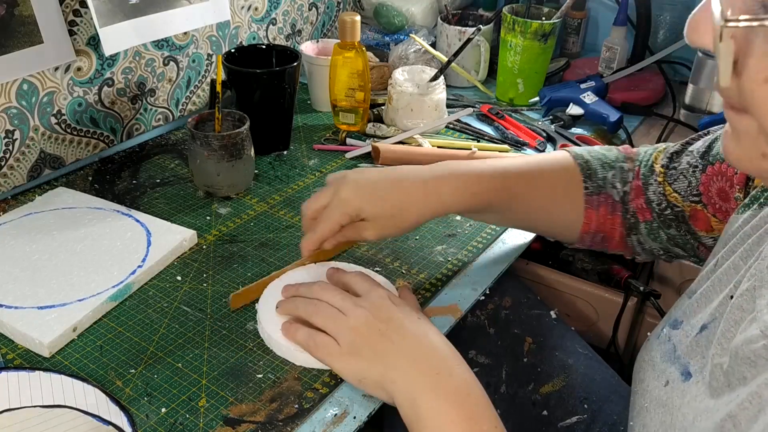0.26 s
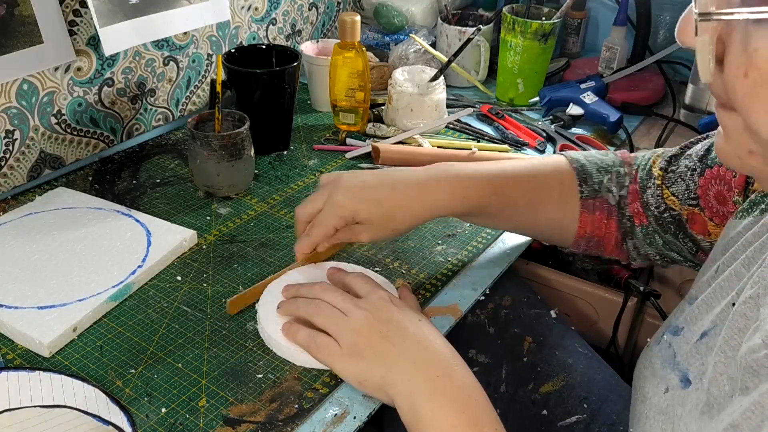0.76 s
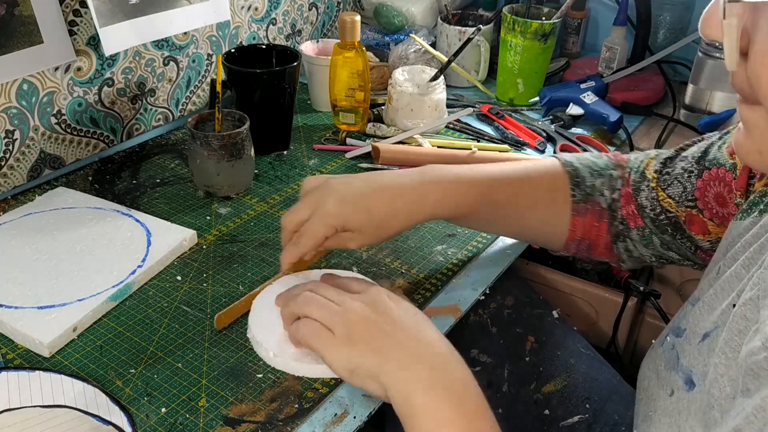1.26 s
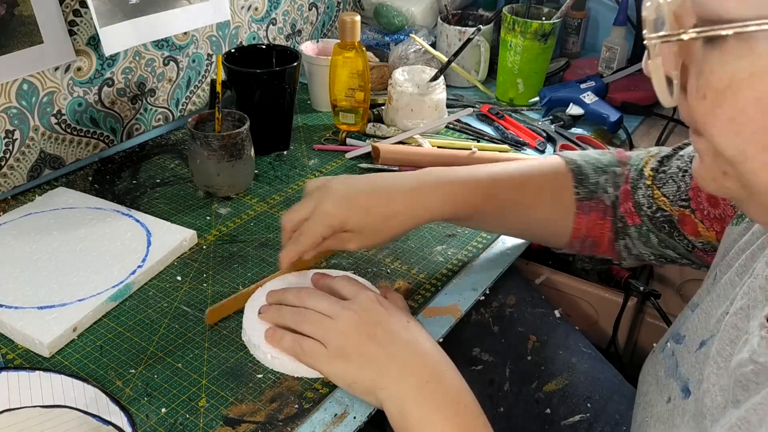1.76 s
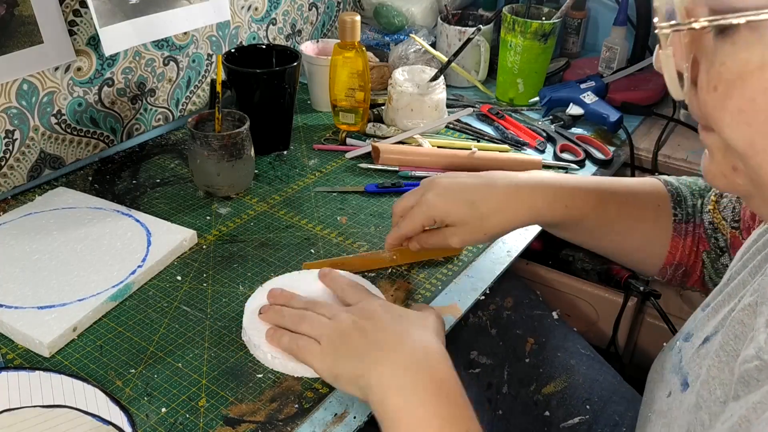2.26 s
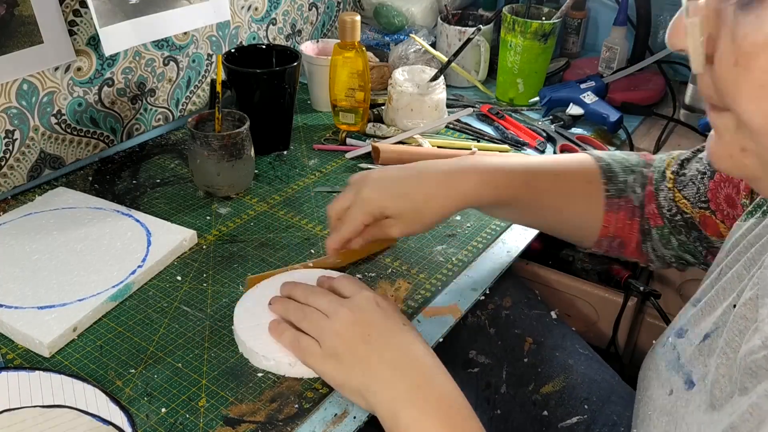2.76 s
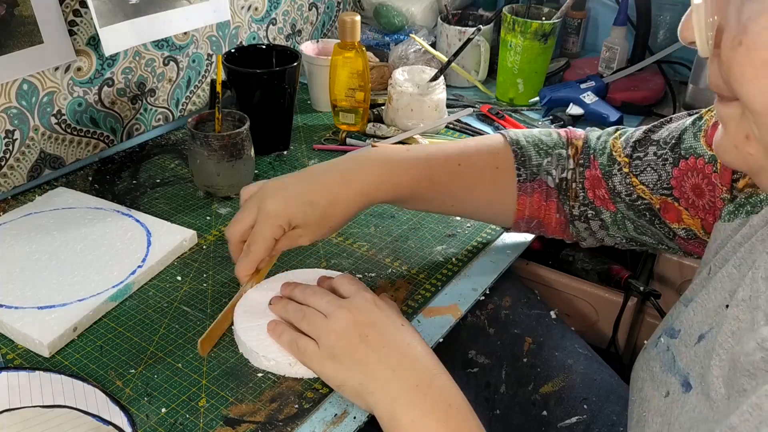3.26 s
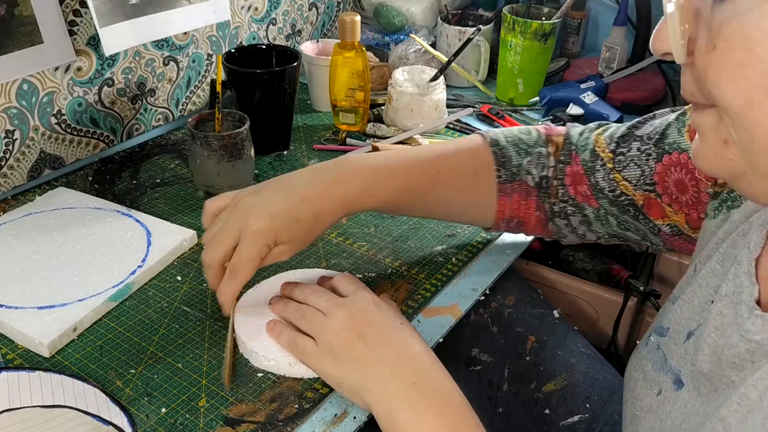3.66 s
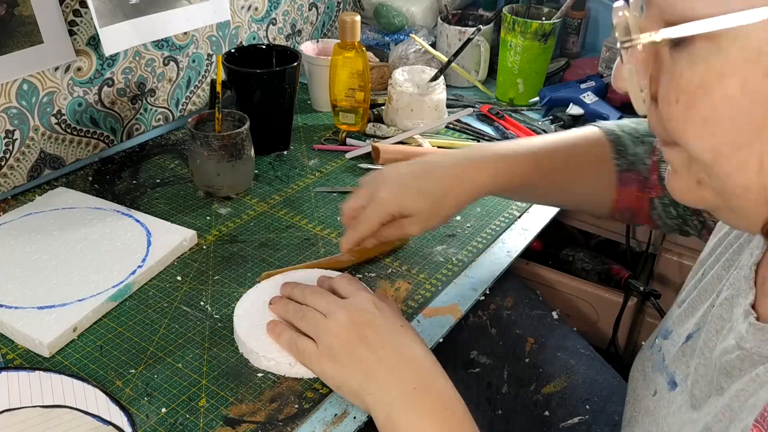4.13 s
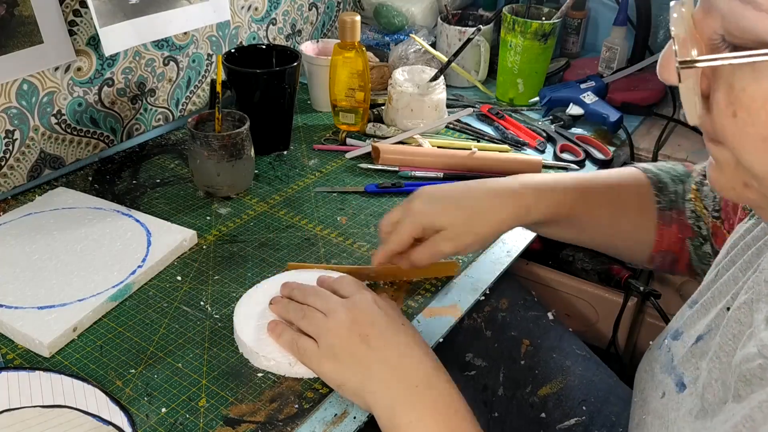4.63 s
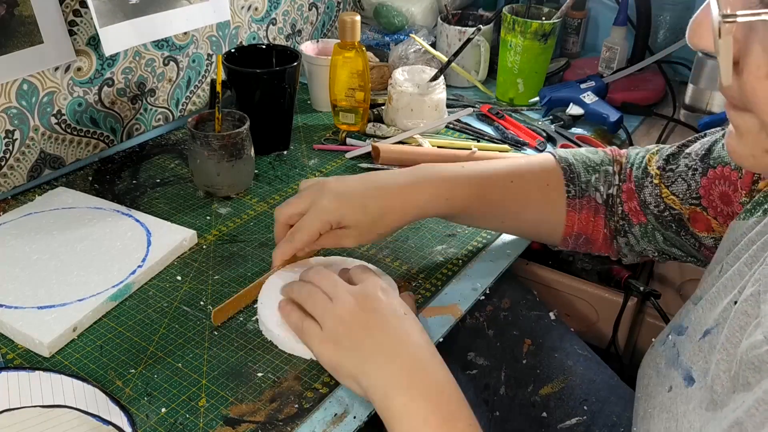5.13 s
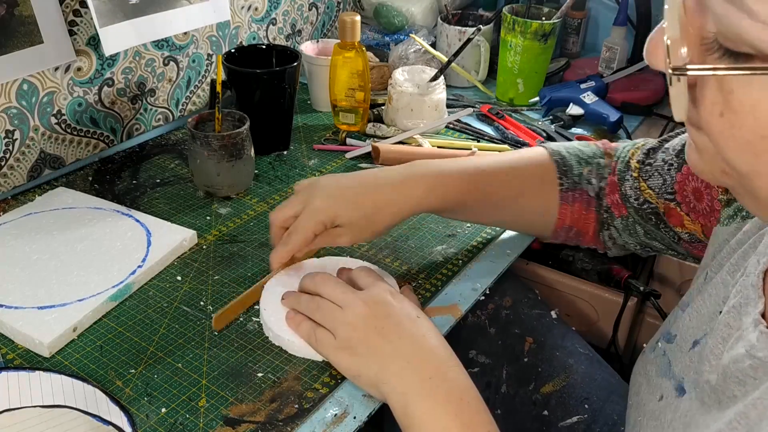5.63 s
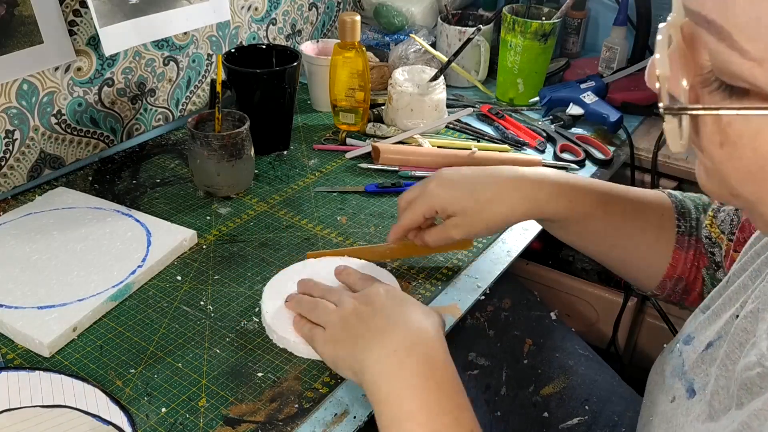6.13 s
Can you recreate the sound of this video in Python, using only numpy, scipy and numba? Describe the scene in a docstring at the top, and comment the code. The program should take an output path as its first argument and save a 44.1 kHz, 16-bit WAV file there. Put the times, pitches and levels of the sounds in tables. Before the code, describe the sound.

Close to a phone microphone in a small craft room, a flat file scrapes to and fro along a foam disc's edge. Quick, uneven strokes swell and fade, each a bright crackling rasp with a thin ringing blade and a lighter body from the disc. Around the middle the rasp turns hollower, then brightens again; small knocks and bead ticks grow more frequent late. Low room noise lies underneath.

```python
"""Flat file on a foam disc, close by

On a craft bench in a small room, a flat file rubs to and fro along a foam disc's rim, close to a phone.
Random snaps make the crackle of breaking cells; the same kind of grains ring the blade and shake the disc.
The file knocks as it lands, single beads tick, and loose crumbs scrape softly underneath.
Hands, bench and walls add short reflections over low room noise, a growing rumble and faint hums.
The phone's two microphone ports colour the sound differently and lose the extreme treble.
"""
import sys
import numpy as np
from scipy import signal
from scipy.fft import rfft, irfft, next_fast_len
from scipy.io import wavfile
from scipy.ndimage import map_coordinates
from numba import njit

SR = 44100
rng = np.random.default_rng(int(sys.argv[2]) if len(sys.argv) > 2 else 0)


def log_audio(samples):
    """Write samples as a 16-bit WAV file to the path given in sys.argv[1]."""
    # one column per channel
    frames = np.atleast_2d(samples).T
    # limit to full scale, then quantise
    limited = np.clip(frames, -1, 1)
    pcm = np.round(limited * 32767).astype(np.int16)
    wavfile.write(sys.argv[1], SR, pcm)


N = 281799
TIME = np.arange(N) / SR

# Strokes of the file; blade and disc are relative to the bite at full effort:
# start_s [s], fastest_s [s], end_s [s], swell_db [dB], fade_db [dB], bite_db [dB],
# blade_db [dB], disc_db [dB], blade resonance near the fastest moment pitch_hz [Hz]
FILE_STROKES = [(-0.015, 0.109, 0.31, 19.5, 20.5, -30, -7.5, -19.5, 3700),
                (0.282, 0.419, 0.59, 12.5, 15, -32.5, -9.5, -29.5, 4500),
                (0.555, 0.69, 0.85, 10.5, 28, -33.5, -8.5, -27, 4850),
                (0.808, 1.015, 1.127, 15, 10, -31.5, -10.5, -21.5, 4160),
                (1.07, 1.23, 1.353, 7.5, 18, -36.0, -6.5, -18, 3270),
                (1.259, 1.31, 1.535, 14, 27.5, -31, -6.5, -19, 3700),
                (1.466, 1.593, 1.745, 8.5, 16.5, -34, -15, -24, 3700),
                (1.715, 1.856, 2.02, 12.5, 23.5, -33.5, -15, -20.5, 4660),
                (2.007, 2.153, 2.38, 11.5, 18, -33.5, -32, -24, 3670),
                (2.365, 2.406, 2.52, 4.5, 17, -40.0, -4.5, -11, 3550),
                (2.454, 2.518, 2.73, 8.5, 14.5, -32.5, -6.5, -19, 3600),
                (2.732, 2.85, 3.003, 3.5, 9.5, -34.5, -12.5, -27, 4180),
                (2.992, 3.172, 3.285, 5, 18, -34.4, -15, -21.5, 3600),
                (3.347, 3.432, 3.581, 1, 17, -34, -30, -27.5, 4800),
                (3.565, 3.703, 3.89, 17, 29, -31.5, -20, -20.5, 2650),
                (3.902, 4.002, 4.11, 14.5, 23, -36.5, -16, -19, 3010),
                (3.992, 4.084, 4.214, 21, 5, -34.5, -13.5, -13, 2430),
                (4.161, 4.213, 4.36, 5, 20, -37, -12, -14, 2450),
                (4.361, 4.48, 4.56, 18, 8, -42.5, -6.5, -15, 3950),
                (4.579, 4.691, 4.857, 10.5, 21.5, -30.5, -12, -21.5, 4560),
                (4.852, 4.872, 4.91, -4, 18, -39, -3, -18.5, 3100),
                (4.962, 5.107, 5.28, 2, 25.5, -33, -4.5, -24, 3700),
                (5.265, 5.405, 5.57, 7, 16, -31.0, -9, -19, 3180),
                (5.554, 5.701, 5.88, 5.5, 27.5, -34.5, -7, -18, 3070),
                (5.848, 5.96, 6.25, 9.5, 21.5, -31, -7, -28, 3210),
                (6.193, 6.232, 6.43, 18, 13, -36.5, -6, -18, 3510),
                (6.289, 6.358, 6.7, 13.5, 20, -30.0, -8, -21.5, 3970)]
# The file digs deeper for a moment: centre_s [s], time from centre to 1/e half_s [s],
# grit_db [dB], blade_db [dB], disc_db [dB]
FILE_DIGS = [(0.468, 0.029, -35, -48, -50), (0.702, 0.032, -41.5, -39, -59), (0.745, 0.018, -52, -49, -51),
             (0.93, 0.065, -36, -44, -52), (1.015, 0.021, -30, -44, -50), (1.395, 0.014, -48, -58, -48),
             (1.574, 0.045, -32, -41, -46.5), (1.791, 0.011, -44, -58, -49),
             (1.883, 0.034, -40.5, -49, -64), (2.149, 0.024, -30, -43, -52), (2.2, 0.058, -41, -42.5, -43),
             (2.533, 0.037, -31.5, -37.5, -66), (2.679, 0.058, -41, -43, -56),
             (2.886, 0.026, -38.5, -62, -62), (3.265, 0.041, -46, -51, -54.5),
             (3.799, 0.065, -44, -48, -50), (4.188, 0.021, -48, -54, -42.5),
             (4.443, 0.014, -37.5, -56, -53), (5.15, 0.04, -45, -40.5, -53), (5.448, 0.028, -37, -42, -44),
             (5.994, 0.032, -41, -41, -49), (6.072, 0.05, -40, -43, -40.5),
             (6.365, 0.0095, -41, -52, -45.5)]
# Hollow rasp of the disc as the file works further round the rim: time_s [s], resonance drive_db [dB]
HOLLOW_RASP = [(0, -26), (3.55, -14), (3.7, 1), (3.9, -2), (4.12, -1), (4.22, -25), (4.4, -40)]
# Bench reflection of the rasp: time_s [s], extra path lag_ms [ms], level_db [dB]
BENCH_REFLECTION = [(0.15, 0.655, -16), (0.6, 0.52, -29), (1.35, 0.7, -15), (1.6, 0.6, -16),
                    (2.2, 0.62, -22), (2.6, 0.73, -20), (3.1, 0.59, -26), (3.5, 0.65, -39),
                    (4.0, 0.56, -24), (4.2, 0.604, -29), (4.9, 0.68, -12), (5.4, 0.71, -19),
                    (6.0, 0.67, -12), (6.3, 0.69, -14)]
# Outline of the snapping foam cells: pitch_hz [Hz], relative level_db [dB]
CELL_SPECTRUM = [(2000, -38), (4800, -11.5), (5800, -10.5), (6500, -7), (7300, -3), (8300, -3.5),
                 (9200, 1.5), (10300, 0.5), (11800, 0), (13500, -8), (16000, -11.5)]
# Outline of the blade's many weak modes: pitch_hz [Hz], relative level_db [dB]
BLADE_SPECTRUM = [(1200, -33.5), (2100, -3.5), (2700, -2), (3600, -2), (4500, 0.5), (5300, 0.5), (6200, 1),
                  (9000, -17.5)]
# Outline of the disc on its mat: pitch_hz [Hz], relative level_db [dB]
DISC_SPECTRUM = [(80, -18), (250, -8.5), (380, -10), (540, -4), (850, 1), (1020, -1.5), (1200, -2),
                 (1550, 2), (2100, -2), (2700, -1.5), (4500, -32)]
# Ringing modes of the blade: pitch_hz [Hz], width_hz [Hz], gain beside the broad spectrum level_db [dB]
BLADE_RINGS = [(2670, 26, -8), (2930, 61, -6), (3430, 110, -12), (3910, 30, -15), (6450, 88, 4)]
# Ringing modes of the disc: pitch_hz [Hz], width_hz [Hz], gain beside the broad spectrum level_db [dB]
DISC_RINGS = [(800, 22, -13.5), (963, 47, -3), (1350, 150, -4), (1625, 62, -5), (2130, 26, -8)]
# Shifting colour of the sliding contact: pitch_hz [Hz], depth_db [dB]
SLIDING_DEPTH = [(500, 1.5), (2000, 2.2), (3200, 4.4), (6200, 4.4), (7500, 1.4), (12000, 1.1)]
# The file lands or catches on the rim: time_s [s], level_db before the part trims [dB],
# disc thump beside it disc_db [dB], dying-away time constant crush_s [s]
RIM_KNOCKS = [(1.566, -28, -24, .008), (2.3917, -24, -24, 0.01), (3.583, -29, -23, 0.013),
              (3.91, -33.5, -16, .012), (4.4366, -26.5, -16, 0.017), (4.587, -25.5, -37, .014),
              (4.863, -26, -24, .014), (4.977, -30, -20, 0.014), (5.282, -34, -33, .012),
              (5.561, -33, -11, .008), (5.8626, -28.5, -30, .007), (5.872, -23.5, -34, 0.012),
              (6.067, -26, -18, 0.011), (6.191, -24, -21, 0.0084), (6.2265, -20.5, -25, 0.011)]
# Single beads snap off: time_s [s], level_db before the common trim [dB],
# blade beside it blade_db [dB], disc beside it disc_db [dB]
BEAD_TICKS = [(0.934, -32, -4, -2), (1.465, -31, -7, -24), (1.567, -25, -24, -19), (1.795, -40, -7, -2),
              (1.906, -36.5, -14, -3.5), (2.335, -41.5, 2, -4), (2.655, -25, -9, -20),
              (2.8182, -34, -9, -6.5), (2.854, -38, -9, -5), (3.382, -21.5, -14, -36),
              (4.2, -34.5, -2, 1.5), (4.834, -42.5, -10, -3.5), (5.562, -30.5, -1, -12),
              (6.0684, -23, -1, -7), (6.184, -43.5, -5, -12)]
# Outline of the room noise: pitch_hz [Hz], relative level_db [dB]
ROOM_SPECTRUM = [(20, -13), (45, -4), (58, -2.5), (78, -4), (110, -0.5), (145, -7.5), (180, 2), (280, 3),
                 (335, 0.5), (380, -7.5), (425, -8), (475, -1), (560, -9), (1500, -18.5), (5000, -15),
                 (15000, -21)]
# Wavering of the room noise: pitch_hz [Hz], depth_db [dB]
ROOM_WAVER = [(60, 1), (180, 2.4), (500, 2.4), (1000, 0)]
# Low rumble behind the room noise: time_s [s], level_db [dB]
RUMBLE_LEVEL = [(0, -77), (4.6, -69), (5.5, -67), (6.39, -62.5)]
# Outline of the rumble: pitch_hz [Hz], relative level_db [dB]
RUMBLE_SPECTRUM = [(20, -10), (60, -2.5), (100, -4.5), (180, -1), (260, -0.5), (400, -26.0), (1500, -47)]
# Low hum that grows with the rumble: time_s [s], pitch_hz [Hz], level_db [dB]
LOW_TONE = [(4.8, 178, -87), (5.6, 178, -67), (6.39, 177, -70)]
# Faint hum sinking slowly to about 268 Hz, then a separate lower hum near 248 Hz:
# time_s [s], pitch_hz [Hz], level_db [dB]
MIDDLE_TONES = [(0, 294, -82), (2.15, 285, -73), (2.33, 285.5, -65.5), (2.52, 285, -61.5), (2.75, 284, -85),
                (3.0, 282, -64.5), (3.5, 281.6, -64), (3.8, 278.8, -73), (4.7, 274.5, -71),
                (4.95, 273, -67), (5.3, 272, -72), (5.6, 268, -63), (5.82, 258.6, -81), (5.93, 248, -71),
                (6.05, 248.3, -57), (6.25, 248, -74)]
# Higher hum that comes and goes: time_s [s], pitch_hz [Hz], level_db [dB]
UPPER_TONE = [(0, 322, -79), (2.35, 326.4, -81), (2.55, 326, -63), (2.72, 325, -76), (2.95, 324, -64),
              (3.2, 324, -76), (3.75, 329.4, -72), (4.0, 325, -69), (4.25, 325, -87)]
# Thin hum, strongest early and late: time_s [s], pitch_hz [Hz], level_db [dB]
HIGH_TONE = [(0, 470, -79), (1.0, 471.7, -70), (1.6, 468, -81), (4.0, 470, -77), (5.5, 463, -87),
             (6.0, 461, -75), (6.39, 457, -75)]
# Colour of the left microphone port: pitch_hz [Hz], gain_db [dB]
LEFT_COLOUR = [(300, 1.5), (850, 3), (1500, 0), (5500, -1.5), (7000, -1), (7900, -1.5), (9200, -3),
               (10400, 0), (11800, 4), (12020, 7.5), (12180, -20), (12600, -24), (13200, 1.5), (15600, 1)]
# Colour of the right microphone port: pitch_hz [Hz], gain_db [dB]
RIGHT_COLOUR = [(300, 0.5), (850, 0.5), (1500, 1), (5500, 0), (7000, 1), (7800, 3.5), (8400, 5), (9200, 4),
                (10300, 1.5), (10800, 4), (11300, -1), (12000, -5), (12250, -71), (13000, -58.5)]
# Phase by which the left port leads the right: pitch_hz [Hz], lead_rad [radians]
LEFT_LEAD = [(100, 0), (850, -0.62), (1200, -1.8), (1900, -0.5), (2500, 1), (3050, -2), (3500, -1.1),
             (4000, 0), (4300, 4.5), (5000, 3.5), (6700, 3.5), (6950, 0.7), (7550, 0), (8050, 1.5),
             (8600, 1.4), (9400, 0.8), (9900, 2.3), (10800, 0.7), (12000, 0.5)]

# The file takes hold and lets go; higher shape powers keep it near full speed for longer
ATTACK_S, RELEASE_S = 0.024, 0.076
SWELL_SHAPE, FADE_SHAPE = 1.8, 1.84
BLADE_LAW, DISC_LAW = 0.8, 0.86  # powers of the stroke's effort
REST_DB = [[-56], [-70.5], [-70.5]]  # grit, blade and disc as the file grazes the rim between strokes
BLADE_SAG_OCTAVES_PER_S = 1
PAN_DB = 1  # snapping cells, left minus right
# Coarse grit catching single beads
CATCHES_PER_S, CATCH_LOW_HZ, CATCH_HIGH_HZ = 300, 6200, 12000
CATCH_CYCLES, CATCH_SCATTER_DB, CATCH_DB = 1.3, 1, -11.5  # cycles to 1/e; level beside the cells
CLUMPS_PER_S, CLUMP_S, CLUMP_DEPTH = 120, .002, .2  # CLUMP_S is the time to 1/e
SHIFT_WIDTH_HZ, SHIFTS_PER_S = 190, 15
ROOM_DB, WAVER_WIDTH_HZ, WAVERS_PER_S = -60, 22, 3
HUM_WANDER_HZ, HUM_FLICKER_DB = .4, 1.2
TOP_HZ = 15750


def filing():
    """Grit tears through foam beads, exciting blade and disc; a harder bite breaks more cells a second."""
    bite_db, blade_db, disc_db = strokes()
    cells_per_s = 9000 * undb(.7 * (bite_db + 31.5))
    # the file sticks and slips over the beads, and the hand's pressure trembles
    force = clumps() * undb(bite_db + 0.61 * walk(60))
    cells = snapping_cells(cells_per_s)
    blade = undb(blade_db) * ringing_blade(cells_per_s)
    disc = undb(disc_db) * shaken_disc(cells_per_s * .6)
    rasp = bench_echo(hand_echo(cells + blade))
    return force * sliding(rasp + disc)


def strokes():
    """Bite in dB, and blade and disc relative to it: effort swells to the fastest moment, then fades."""
    power = undb(REST_DB) ** 2 * np.ones(N)
    for start, fastest, end, swell_db, fade_db, bite_db, blade_db, disc_db, _ in FILE_STROKES:
        early = np.interp(TIME, [start, fastest], [1, 0])
        late = np.interp(TIME, [fastest, end], [0, 1])
        hold = np.clip((TIME - start) / ATTACK_S, 0, 1)
        release = np.clip((end - TIME) / RELEASE_S, 0, 1)
        speed_db = -swell_db * early ** SWELL_SHAPE - fade_db * late ** FADE_SHAPE
        effort = hold * release * undb(speed_db)
        blade = undb(blade_db) * effort ** BLADE_LAW
        disc = undb(disc_db) * effort ** DISC_LAW
        power += (undb(bite_db) * np.array([effort, blade, disc])) ** 2
    for s, half_s, grit_db, blade_db, disc_db in FILE_DIGS:
        depth = np.exp(-((TIME - s) / half_s) ** 2)
        power += (undb([[grit_db], [blade_db], [disc_db]]) * depth) ** 2
    bite, blade, disc = 10 * np.log10(power)
    return bite, blade - bite, disc - bite


def clumps():
    """Clumps of beads give way at once and die away in milliseconds; the gain's mean power is 1."""
    kicks = (rng.random(N) < CLUMPS_PER_S / SR) * np.minimum(rng.exponential(size=N), 2)
    decay = np.exp(-1 / (CLUMP_S * SR))
    rough = 1 + CLUMP_DEPTH * signal.lfilter([1], [1, -decay], kicks)
    return rough / np.sqrt(np.mean(rough ** 2))


def snapping_cells(per_s):
    """Foam cells break in a dense crackle, with single beads caught among them."""
    crackle = unit(colour(grains(per_s, scatter_db=1.0, shared=0.32), CELL_SPECTRUM))
    pan_db = np.array([[.5], [-.5]]) * PAN_DB
    return crackle * undb(pan_db - 0.5 + 0.5 * walk(180)) + undb(CATCH_DB) * catches()


def catches(size=256):
    """Single beads pop as short decaying sines, mostly high; low ones are weaker."""
    out, t = np.zeros((2, N + size)), np.arange(size) / SR
    for when, pitch, strength, left, right in rng.random((int(CATCHES_PER_S * N / SR), 5)):
        hz = CATCH_LOW_HZ * (CATCH_HIGH_HZ / CATCH_LOW_HZ) ** np.sqrt(pitch)
        scatter = min(-np.log(1 - strength), np.pi)
        gain = undb(CATCH_SCATTER_DB * scatter) * hz / CATCH_HIGH_HZ
        ports = np.array([[left], [right]])  # sets both strength and phase at each port
        wave = (.5 + ports) * np.sin(2 * np.pi * (hz * t + ports))
        envelope = np.exp(-hz * t / CATCH_CYCLES) * (1 - np.exp(-2 * hz * t))
        at = int(when * N)
        out[:, at:at + size] += gain * wave * envelope
    return unit(out[:, :N])


def ringing_blade(per_s):
    """Grains excite fixed blade modes and a strong resonance that moves as the contact slides."""
    blade_hz = blade_pitch() * np.exp(0.058 * walk(16))
    blade = ringing(colour(grains(per_s, scatter_db=1.97, shared=0.35), BLADE_SPECTRUM), BLADE_RINGS)
    moving = np.array([resonate(port, blade_hz, 2400.0) for port in blade])
    return unit(blade + moving) * undb(0.77 * walk(130) + 1.15 * walk(25))


def blade_pitch():
    """Each stroke starts with a fresh grip; the blade's resonance then sinks until the next one."""
    start, fastest, *_, hz = np.transpose(FILE_STROKES)
    now = np.maximum(np.searchsorted(start, TIME) - 1, 0)
    octaves = np.clip(BLADE_SAG_OCTAVES_PER_S * (fastest[now] - TIME), -1, 1)
    return hz[now] * 2 ** octaves


def shaken_disc(per_s):
    """Whole beads tearing loose shake the disc's modes and its hollow resonance."""
    shaken = colour(grains(per_s, scatter_db=2.5, shared=0.56), DISC_SPECTRUM)
    disc = unit(ringing(shaken, DISC_RINGS))
    hollow_db, = curves(HOLLOW_RASP)
    hollow_hz = 2050 * np.exp(0.018 * walk(9.1))
    hollow = 2 * undb(hollow_db) * np.array([resonate(port, hollow_hz, 470.0) for port in disc])
    return (disc + hollow) / (1 + 0.62 * undb(hollow_db)) * undb(2.0 * walk(55))


def hand_echo(x, lag_s=.0011, travel=0.1214, echo_db=-10):
    """The hands reflect the rasp over a short path that changes as they move."""
    lag = lag_s * np.exp(travel * walk(6))
    # the path to the right port is longer
    return with_echo(x, [lag, 1.3 * lag], echo_db)


def bench_echo(x):
    """The bench returns the rasp a moment later, combing its colour as the file changes height."""
    lag_ms, echo_db = curves(BENCH_REFLECTION)
    return with_echo(x, [lag_ms / 1000] * 2, echo_db)


def sliding(x):
    """The rasp's colour keeps shifting as the contact moves along blade and rim."""
    return shifting(x, SLIDING_DEPTH, SHIFT_WIDTH_HZ, SHIFTS_PER_S, size=512)


def knocks(crack_db=-11, body_db=-9, rise_s=0.0023):
    """Each landing crushes a clump of cells at once and thumps the disc."""
    crack, thump = np.zeros((2, N))
    for s, db, disc_db, crush_s in RIM_KNOCKS:
        rise = np.clip(1 + (TIME - s) / rise_s, 0, 1)
        push = rise * np.exp(-np.abs(TIME - s) / crush_s)
        crack += undb(db) * push
        thump += undb(db + disc_db) * push
    snaps = grains(20000, scatter_db=4.0, shared=0.12)
    bright = unit(colour(snaps, CELL_SPECTRUM) + 0.28 * colour(snaps, BLADE_SPECTRUM))
    body = unit(colour(snaps, DISC_SPECTRUM))
    return undb(crack_db) * crack * bright + undb(body_db) * thump * body


def ticks(snap_s=0.0012, snap_db=-3):
    """A bead breaking away gives one short crack with parts coloured by cells, blade and disc."""
    bursts = np.zeros((3, N))
    for s, db, blade_db, disc_db in BEAD_TICKS:
        levels_db = [[db], [db + blade_db], [db + disc_db]]
        bursts += undb(levels_db) * np.exp(-((TIME - s) / snap_s) ** 2)
    snaps = grains(30000, scatter_db=1, shared=.5)
    spectra = (CELL_SPECTRUM, BLADE_SPECTRUM, DISC_SPECTRUM)
    return undb(snap_db) * sum(burst * unit(colour(snaps, part)) for burst, part in zip(bursts, spectra))


def crumbs(rate=500, crumb_db=-65):
    """Loose crumbs scrape under the file throughout, at a faint, fluttering level."""
    snaps = grains(rate, scatter_db=2.5, shared=0.34)
    scrape = unit(colour(snaps, BLADE_SPECTRUM) + 0.78 * colour(snaps, DISC_SPECTRUM))
    return undb(crumb_db + 3.8 * walk(28)) * sliding(scrape)


def reflections(x, t60=0.056, wet_db=-12):
    """Bench clutter and near walls return a short, dense tail of decaying noise."""
    t = TIME[:SR // 2]
    decay = np.exp(-np.log(1000) * t / t60) * (t > .002)
    tail = rng.standard_normal((2, len(t))) * decay
    tail /= np.sqrt(np.sum(tail ** 2, axis=1, keepdims=True))
    return undb(wet_db) * signal.fftconvolve(x, tail, axes=1)[:, :N]


def background(apart=0.53):
    """Wavering low room noise, partly shared by both ports, with a growing rumble and faint hums."""
    noise = rng.standard_normal((6, N))
    air = colour(noise[2] + apart * noise[:2], ROOM_SPECTRUM)
    air = unit(shifting(air, ROOM_WAVER, WAVER_WIDTH_HZ, WAVERS_PER_S, size=4096))
    rumble = unit(colour(noise[5] + apart * noise[3:5], RUMBLE_SPECTRUM))
    rumble_db, = curves(RUMBLE_LEVEL)
    hums = sum(hum(rows) for rows in (LOW_TONE, MIDDLE_TONES, UPPER_TONE, HIGH_TONE))
    return air * undb(ROOM_DB + 0.22 * walk(7.7)) + rumble * undb(rumble_db) + hums


def hum(rows):
    """A faint sine with slightly unsteady pitch and level, following a table."""
    hz, db = curves(rows)
    phase = 2 * np.pi * np.cumsum(hz + HUM_WANDER_HZ * walk(14)) / SR
    return np.sqrt(2) * np.sin(phase) * undb(db + HUM_FLICKER_DB * walk(11))


def grains(rate, scatter_db, shared):
    """Uneven snaps, rate a second, level held as rate varies; a share of power is common to both ports."""
    chance = np.clip(rate / SR, 0, 1)
    sizes = undb(scatter_db * np.minimum(rng.exponential(size=(3, N)), 6))
    signs = rng.choice([-1, 1], (3, N))
    snaps = (rng.random((3, N)) < chance) * signs * sizes / np.sqrt(chance)
    return np.sqrt(shared) * snaps[2] + np.sqrt(1 - shared) * snaps[:2]


def ringing(x, modes):
    """Add the ring of an object's modes to what excites it."""
    out = x.copy()
    for hz, width, db in modes:
        b, a = signal.iirpeak(hz, hz / width, fs=SR)
        out += undb(db) * signal.lfilter(b, a, x)
    return out


@njit
def resonate(x, hz, width):
    """Band-pass with a moving centre, gain 1 at the peak."""
    y, band, low = np.empty(len(x)), 0., 0.
    for i in range(len(x)):
        g, damping = np.tan(np.pi * hz[i] / SR), width / hz[i]
        v = (band + g * (x[i] - low)) / (1 + g * (g + damping))
        band = 2 * v - band
        low += 2 * g * v
        y[i] = damping * v
    return y


def with_echo(x, lags_s, echo_db):
    """Add one delayed copy at each port, scaled down for the added power."""
    late = [map_coordinates(port, [(TIME - lag) * SR], order=3) for port, lag in zip(x, lags_s)]
    return (x + undb(echo_db) * np.array(late)) / np.sqrt(1 + undb(echo_db) ** 2)


def shifting(x, depth, width_hz, per_s, size):
    """Neighbouring bands swell and shrink at random; each band's gain has mean power 1."""
    overlap = size * 3 // 4
    hz, s, bands = signal.stft(x, SR, nperseg=size, noverlap=overlap)
    places = np.meshgrid(hz / width_hz, s * per_s, indexing="ij")
    chance = map_coordinates(rng.standard_normal((256, 256)), places, order=3, mode="mirror")
    depth_db = np.interp(hz, *np.transpose(depth))[:, None]
    gain = undb(depth_db * np.minimum(chance, 1.5))
    gain /= np.sqrt(np.mean(gain ** 2, axis=1, keepdims=True))
    return signal.istft(bands * gain, SR, nperseg=size, noverlap=overlap)[1][:, :N]


def colour(x, points):
    """Causal minimum-phase filter with the given (Hz, dB) outline."""
    size = next_fast_len(N + 8192, True) // 2 * 2
    hz, db = np.transpose(points)
    gain = undb(np.interp(log_bins(size), np.log(hz), db))
    # folding the cepstrum forward makes the filter causal
    cepstrum = irfft(np.log(gain))
    cepstrum[1:size // 2] *= 2
    cepstrum[size // 2 + 1:] = 0
    return irfft(rfft(x, size) * np.exp(rfft(cepstrum)))[..., :N]


def log_bins(size):
    """Log frequencies of the FFT bins, offset by 1 Hz to admit zero."""
    return np.log(np.fft.rfftfreq(size, 1 / SR) + 1)


def walk(rate):
    """Random control line: rate normal draws a second, joined by straight lines."""
    return np.interp(TIME * rate, np.arange(8192), rng.standard_normal(8192))


def curves(rows):
    """Each column of a table joined by straight lines in time."""
    s, *columns = np.transpose(rows)
    return [np.interp(TIME, s, column) for column in columns]


def unit(pair):
    """Scale a stereo pair so that its centre has rms 1."""
    return pair / pair.mean(axis=0).std()


def undb(db):
    """Decibels to gain."""
    return 10 ** (np.asarray(db) / 20)


def scene():
    """File and disc close by, with the room's reflections and background."""
    work = filing() + knocks() + ticks() + crumbs()
    return work + reflections(work) + background()


def record(dry):
    """Each port has its own colour, the left a phase lead by frequency; the phone cuts the top."""
    size = next_fast_len(N + 8192, True)
    left_db, right_db, lead = (np.interp(log_bins(size), np.log(hz), value)
                               for hz, value in map(np.transpose, (LEFT_COLOUR, RIGHT_COLOUR, LEFT_LEAD)))
    response = np.array([undb(left_db) * np.exp(1j * lead), undb(right_db)])
    ports = irfft(rfft(dry, size) * response, size)[:, :N]
    top_cut = signal.ellip(10, .2, 80, TOP_HZ, fs=SR, output="sos")
    return signal.sosfilt(top_cut, ports)


dry = scene()
out = record(dry)
log_audio(out)
```